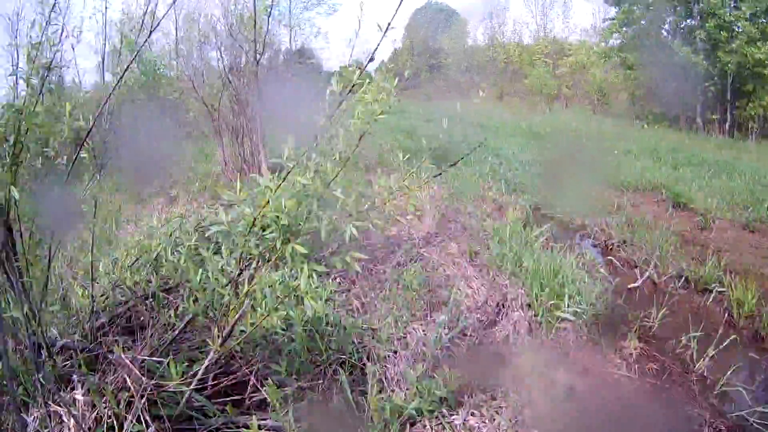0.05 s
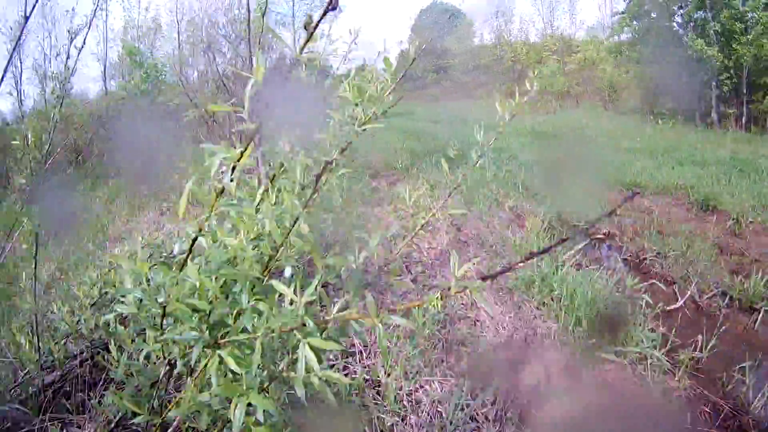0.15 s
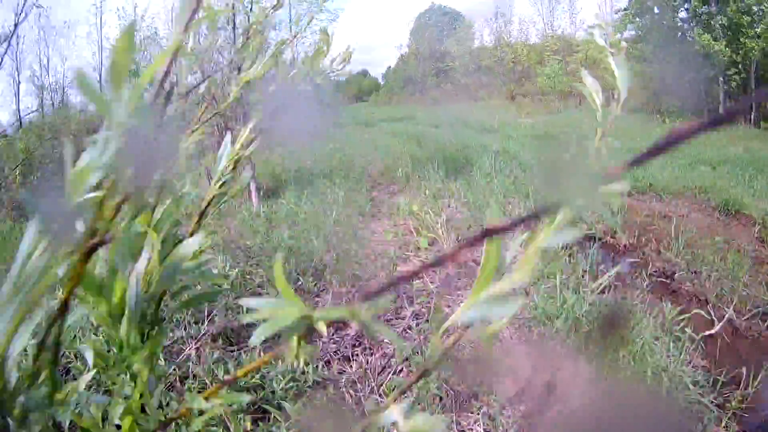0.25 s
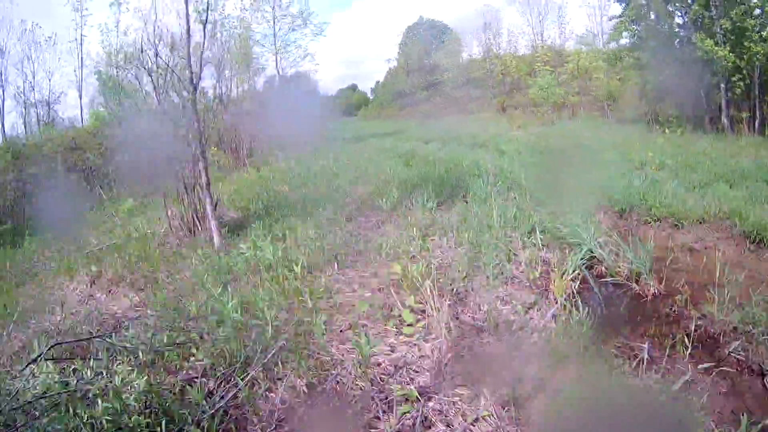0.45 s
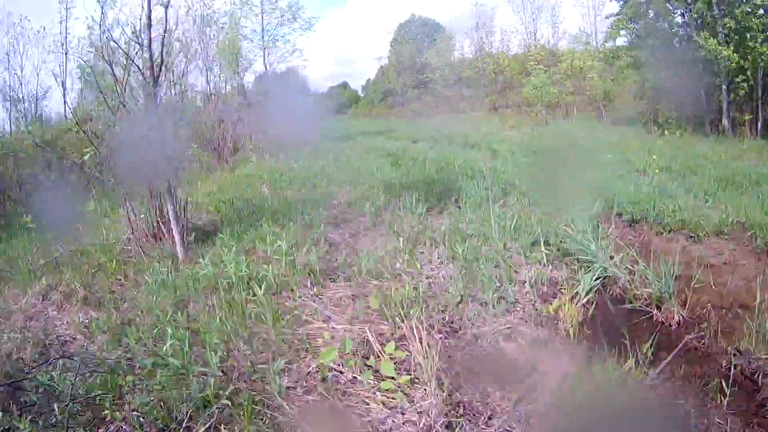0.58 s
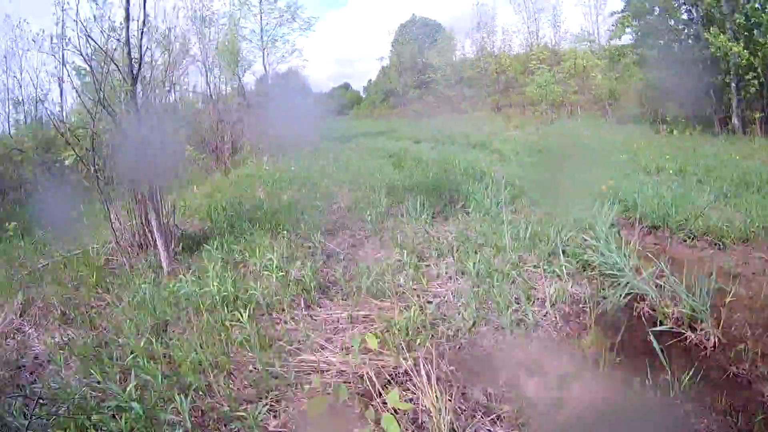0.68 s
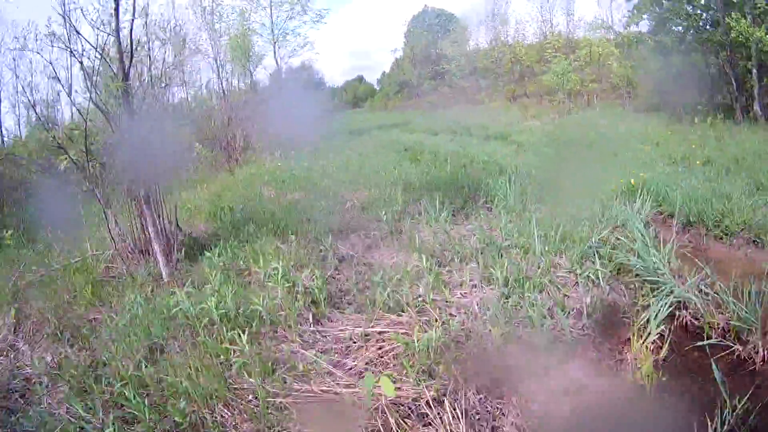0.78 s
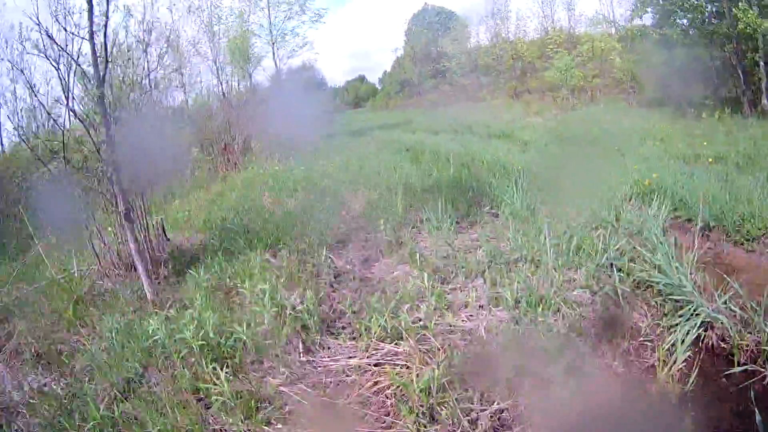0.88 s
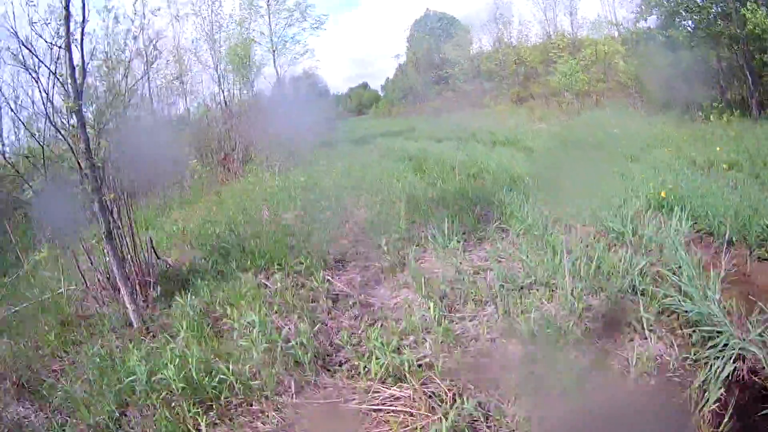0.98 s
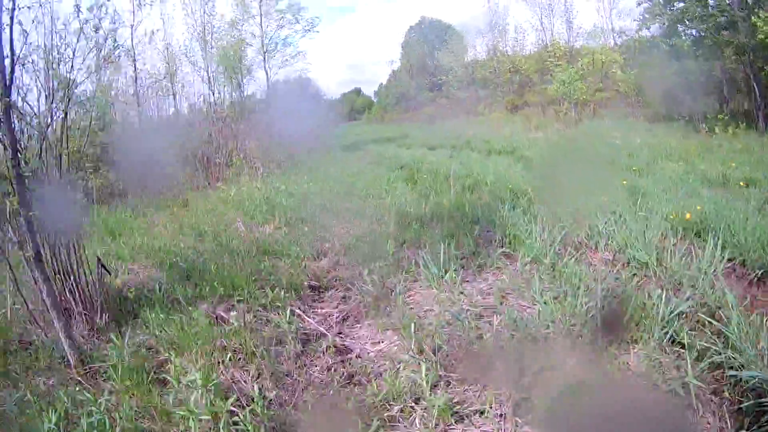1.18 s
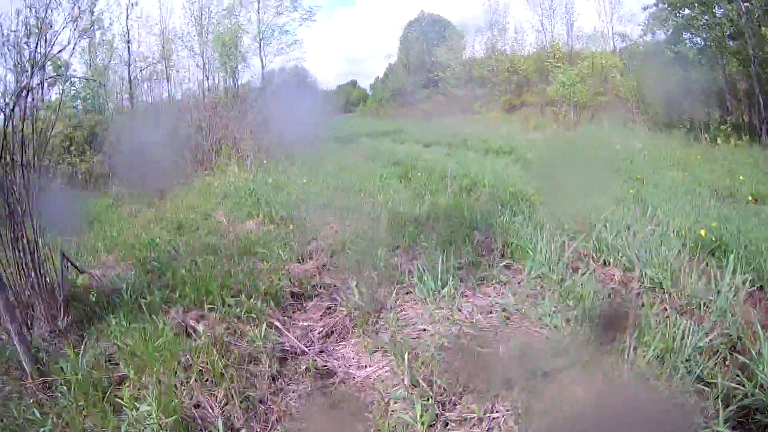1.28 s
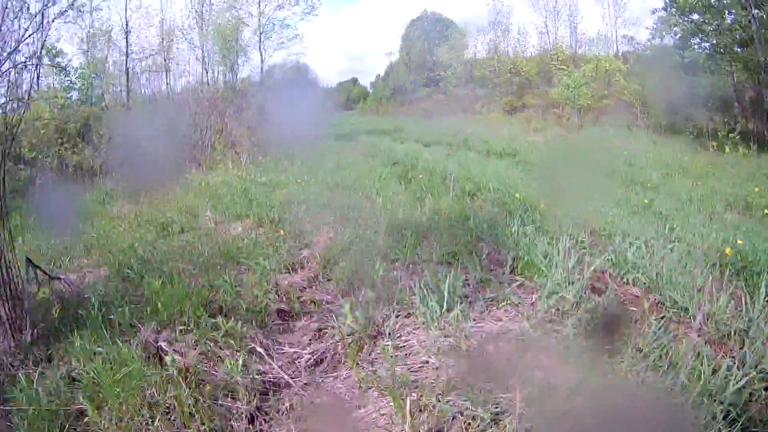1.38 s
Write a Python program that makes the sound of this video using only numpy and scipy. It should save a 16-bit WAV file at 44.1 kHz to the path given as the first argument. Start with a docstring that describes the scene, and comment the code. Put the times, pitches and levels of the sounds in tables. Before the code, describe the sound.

Close, hollow knocks of a branch strike a plastic vehicle shell, ending in a hard, cracking slap. Then twigs tick and a panel thuds softly over bumps, while the off-road vehicle crawls along a trail with a low, uneven rumble.

```python
"""A leafy branch knocks four times on the plastic shell of an off-road vehicle, close to the microphone.
Each blow rings the shell's modes under contact noise and cracks; the last slap shoves the mount and clips.
Later, twigs tick against the body and a panel thuds softly over bumps. Underneath, the vehicle crawls
along a grassy trail, its uneven firings rumbling through the exhaust under a dull running noise."""
import sys
import numpy as np
from scipy.fft import rfft, irfft, next_fast_len
from scipy.io import wavfile

SR = 44100
rng = np.random.default_rng(int(sys.argv[2]) if len(sys.argv) > 2 else 0)


def pcm_store(signal):
    """Save signal as 16-bit PCM."""
    levels = np.round(np.clip(np.atleast_2d(signal), -1, 1) * 32767)
    wavfile.write(sys.argv[1], SR, levels.astype(np.int16).T)


N = 63945
CONTACT_RISE_S = 0.00051


def amp(db):
    """dB to gain."""
    return 10 ** (np.asarray(db) / 20)


def unit(x):
    """Scale to rms 1."""
    return x / np.sqrt(np.mean(x ** 2) + 1e-20)


def curves(rows):
    """Per-sample curve for each column after t/s."""
    times_s, *cols = np.transpose(rows)
    return [np.interp(np.arange(N) / SR, times_s, col) for col in cols]


def since(start_s):
    """Seconds since start_s, zero before."""
    return np.maximum(np.arange(N) / SR - start_s, 0)


def colour(points):
    """Gain against frequency from rows of f/Hz, level/dB."""
    f_hz, db = np.transpose(points)
    return lambda hz: amp(np.interp(np.log(hz + 1), np.log(f_hz + 1), db))


def filtered(x, gain):
    """Minimum-phase filter with magnitude gain(hz)."""
    m = 2 * next_fast_len(N)
    cepstrum = irfft(np.log(np.maximum(gain(np.fft.rfftfreq(m, 1 / SR)), 1e-6)))
    cepstrum[1:m // 2] *= 2
    cepstrum[m // 2 + 1:] = 0
    return irfft(rfft(x, m) * np.exp(rfft(cepstrum)))[:N]


def noise(gain):
    """Coloured noise, rms 1."""
    return unit(filtered(rng.standard_normal(N), gain))


def burst(start_s, decay_s, gain, rise_s=CONTACT_RISE_S):
    """Rough contact: noise with quick rise, exponential fall."""
    t = since(start_s)
    return noise(gain) * (1 - np.exp(-(t / rise_s) ** 2)) * np.exp(-t / decay_s)


def swell(t, rise_s, t60_s):
    """Soft attack and decay, peak 1."""
    shape = (1 - np.exp(-(t / rise_s) ** 2)) * amp(-60 * t / t60_s)
    return shape / shape.max()


def mode(t, hz, db, t60_s):
    """Damped sine of one struck mode."""
    return amp(db - 60 * t / t60_s) * np.sin(2 * np.pi * hz * t)


def vehicle():
    """Uneven firings through the exhaust, rumble, boom, and running noise throbbing at the firing rate."""
    engine = [(0, 24.8, -42), (.25, 25.3, -38), (.48, 26, -39), (.62, 25, -40.5), (.83, 27.5, -46),
              (.9, 28.4, -38), (.98, 27.5, -33), (1.05, 27, -40), (1.2, 26.5, -39), (1.3, 29, -40),
              (1.45, 22, -37.5)]  # t/s, firing rate/Hz, level/dB
    exhaust_spectrum = [(10, -11), (28, -10), (55, -4.5), (82, 1.5), (105, -1.5), (135, -3), (170, -11.5),
                        (260, -17.5), (500, -50), (2000, -73)]  # f/Hz, level/dB
    running_spectrum = [(100, -4.5), (230, -5.5), (320, -11.5), (410, -3.5), (500, 2.5), (570, -5),
                        (690, -3.5), (790, -14.5), (900, -8.5), (1200, -14.5), (1500, -7.5), (1800, -11),
                        (2150, -21), (2550, -37), (3800, -35), (5000, -50), (7000, -53), (9000, -74.5)]  # f/Hz, level/dB
    running_levels = [(0, -39.5), (.2, -39.5), (.43, -38.5), (.56, -43), (.82, -43), (.92, -36.5),
                      (1.06, -42), (1.27, -38), (1.45, -40.5)]  # t/s, level/dB
    boom_levels = [(0, -53), (.06, -40), (.14, -48), (.25, -42), (.33, -49), (.46, -44), (.58, -61.5),
                   (.78, -47.5), (.84, -52), (.885, -34), (.94, -50), (1.05, -53.5), (1.45, -58)]  # exhaust boom: t/s, level/dB
    jitter_s, scatter_db, rumble_db = 0.00088, 4, 6.5
    throb_depth, boom_order = 0.16, 3
    rate_hz, level_db = curves(engine)
    cycles = np.cumsum(rate_hz) / SR
    firings = np.flatnonzero(np.diff(np.floor(cycles)))
    rumble = noise(colour(exhaust_spectrum))
    running = noise(colour(running_spectrum))
    lag, strength = rng.standard_normal((len(firings), 2)).T
    firings = np.clip(firings + lag * jitter_s * SR, 0, N - 1).astype(int)
    pulses = np.bincount(firings, amp(scatter_db * strength), N)
    exhaust = unit(filtered(pulses, colour(exhaust_spectrum)))
    running *= amp(curves(running_levels)[0]) * (1 + throb_depth * np.cos(2 * np.pi * cycles))
    boom = amp(curves(boom_levels)[0]) * unit(np.sin(2 * np.pi * boom_order * cycles))
    return amp(level_db) * unit(exhaust + amp(rumble_db) * rumble) + boom + running


def bumps():
    """Trail bumps: hollow panel thuds with slight rattle, low wheel jolts."""
    thuds = [(.655, -27, 497), (.891, -19, 477), (.947, -27, 530.4), (1.268, -31.5, 568)]  # t/s, level/dB, f/Hz
    jolts = [(.955, -32.5, 79), (1.283, -31, 50)]  # t/s, level/dB, f/Hz
    rattle_spectrum = [(100, -9.5), (230, 3.5), (450, -2.5), (800, 0.5), (1100, -5.5), (1300, -7),
                       (1900, -5), (2500, -29.5), (5000, -48), (16000, -86.5)]  # f/Hz, level/dB
    rattle_db = -10.5
    out = np.zeros(N)
    for start_s, db, hz in thuds:
        t = since(start_s)
        panel = np.sin(2 * np.pi * hz * t) + amp(rattle_db) * noise(colour(rattle_spectrum))
        out += amp(db) * swell(t, rise_s=0.0055, t60_s=0.068) * panel
    for start_s, db, hz in jolts:
        t = since(start_s)
        out += amp(db) * swell(t, rise_s=0.012, t60_s=0.16) * np.sin(2 * np.pi * hz * t)
    return out


def twigs_and_leaves():
    """Dry twig ticks and thin leaf flicks against the body."""
    ticks = [(.393, -29.5, 0.0028), (0.655, -49.5, .012), (.72, -50.5, 0.006), (0.737, -48.5, .003),
             (.765, -38.5, 0.0047), (0.775, -54, .004), (0.859, -39.5, .005), (0.885, -50, 0.013),
             (0.948, -48, 0.0072), (0.975, -42, 0.0045)]  # t/s, level/dB, decay/s
    flicks = [(.005, -55.5, 0.0091), (0.094, -59, 0.0045), (0.109, -59.5, .005), (0.156, -62.5, 0.012),
              (0.21, -62, .008), (.42, -61.5, 0.011)]  # t/s, level/dB, decay/s
    twig_spectrum = [(200, -16.5), (1200, -4.5), (1850, 6), (2400, -13.5), (3100, -4.5), (4500, -12),
                     (5000, -29), (7200, -34), (7900, -46), (16000, -57)]  # f/Hz, level/dB
    leaf_spectrum = [(500, -27), (3000, 0.5), (5800, -9), (7200, -8.5), (8000, -15), (16000, -30)]  # f/Hz, level/dB
    out = np.zeros(N)
    for contacts, spectrum in (ticks, twig_spectrum), (flicks, leaf_spectrum):
        for start_s, db, decay_s in contacts:
            out += amp(db) * burst(start_s, decay_s, colour(spectrum))
    return out


def mount_shove():
    """The hardest slap shoves the microphone mount: one low pulse, short sway."""
    mount_modes = [(55.3, -14, 0.13), (138, -11, .12), (209, -19.5, 0.17)]  # f/Hz, level/dB, t60/s
    slap_s, width_s, level_db = 0.3462, 0.0014, -11
    shove = np.exp(-((np.arange(N) / SR - slap_s) / width_s) ** 2)
    sway = sum(mode(since(slap_s), *row) for row in mount_modes)
    return amp(level_db) * (shove - sway)


def wood_snaps():
    """Short bright cracks within the blows set the branch's wood ringing."""
    snaps = [(0.221, -43, 0.0012, -43), (0.2537, -27.5, 0.00058, -21), (0.344, -7.5, 0.0017, -20.5),
             (0.356, -7, .0005, -28.5)]  # t/s, level/dB, decay/s, ring level/dB
    snap_spectrum = [(500, -26.5), (2000, -6.5), (4400, 6.5), (6000, -7), (7200, -7), (8000, -26),
                     (10500, -16.5), (11700, -12.5), (12900, -31), (15200, -35), (16400, -62.5)]  # f/Hz, level/dB
    wood_modes = [(2907, -5, .02), (4420, 0, 0.02), (5750, -20.5, 0.021)]  # f/Hz, level/dB, t60/s
    out = np.zeros(N)
    for start_s, db, decay_s, ring_db in snaps:
        t = since(start_s)
        ring = sum(mode(t, *row) for row in wood_modes)
        ring *= 1 - np.exp(-t / CONTACT_RISE_S)
        snap = burst(start_s, decay_s, colour(snap_spectrum), rise_s=0.000098)
        out += amp(db) * snap + amp(ring_db) * ring
    return out


def branch():
    """Each blow rings a band of shell modes, with contact noise and a crack; leaves drag in between."""
    # 2-3 blows per knock: t/s, level/dB, band centre/Hz, half-width/oct, decay/s, relative crack/dB
    blows = [(0.2227, -7, 1640, 0.33, 0.0035, -15), (.2245, -12, 606, 0.47, 0.0022, -21.5),
             (0.2468, -11, 1340, 0.17, 0.0075, -20), (.2522, 0, 1047, .7, 0.0023, -21),
             (.2530, -3, 415.4, 0.38, 0.0046, -32), (0.3011, -7.5, 1720, 0.26, .007, -20),
             (.3025, -3.5, 636, .4, 0.0065, -35), (0.3451, 2.5, 1657, 0.79, .003, -6),
             (0.3524, -2, 1850, .5, .0038, -5.5), (.360, -11.5, 703, 1.0, 0.0026, -24)]
    shell_modes = [(326.2, -4.5, 0.17), (413.2, 0.5, .085), (495, -6.5, 0.053), (569, -7, 0.067),
                   (652.4, -6, .075), (698.5, -4, 0.1), (881.6, -2.5, 0.043), (940, -6, 0.036),
                   (1098, -5.5, 0.029), (1320, -4.5, 0.036), (1444, -2.5, 0.017), (1585, -3, 0.049),
                   (1824, -8.5, 0.048), (2176, -6, .035), (4400, -25, 0.02)]  # f/Hz, level/dB, t60/s
    contact_spectrum = [(100, -30), (250, -26.5), (330, 0.5), (1000, 7.5), (1900, -1), (2500, -20),
                        (4400, -19), (5200, -35), (7200, -42), (8000, -57), (16000, -65)]  # f/Hz, level/dB
    crack_spectrum = [(200, -21), (900, -4), (1900, 0), (2500, -6), (4400, -9.5), (5200, -20.5),
                      (7200, -35), (7900, -48), (16000, -64)]  # f/Hz, level/dB
    leaf_drag = [(.2, -60), (.225, -39.5), (.27, -32), (.295, -38.5), (.32, -27), (.342, -16.5),
                 (.362, -27.5), (.382, -40), (.43, -56), (.5, -66)]  # t/s, level/dB
    ring_db, contact_db, scatter_db = -5, -7, 1
    contact_gain = colour(contact_spectrum)
    out = amp(curves(leaf_drag)[0]) * noise(contact_gain)
    for start_s, db, centre_hz, width_oct, decay_s, crack_db in blows:
        t = since(start_s)
        band = lambda hz: 1 / (1 + (np.log2((hz + 1) / centre_hz) / width_oct) ** 4)
        ring = sum((-1) ** k * band(hz) * mode(t, hz, mode_db + rng.normal(0, scatter_db), t60_s)
                   for k, (hz, mode_db, t60_s) in enumerate(shell_modes))
        ring *= 1 - np.exp(-t / CONTACT_RISE_S)
        contact = burst(start_s, decay_s, lambda hz: band(hz) * contact_gain(hz))
        crack = burst(start_s, decay_s, colour(crack_spectrum))
        out += amp(db) * (amp(ring_db) * ring + amp(contact_db) * contact + amp(crack_db) * crack)
    return out


def scene():
    """All sources at one microphone, over its faint hiss."""
    hiss = amp(-79.5) * rng.standard_normal(N)
    knocks = branch() + wood_snaps() + mount_shove()
    return (hiss + knocks + twigs_and_leaves() + bumps() + vehicle())[None]


def record(dry):
    """Recorder: clips the loudest blows, then band-limits."""
    ceiling, hardness, cutoff_hz = 0.95, 8, 16400
    clipped = dry / (1 + np.abs(dry / ceiling) ** hardness) ** (1 / hardness)
    m = 2 * next_fast_len(N)
    passband = np.fft.rfftfreq(m, 1 / SR) < cutoff_hz
    return irfft(rfft(clipped, m) * passband, m)[:, :N]


dry = scene()
out = record(dry)
pcm_store(out)
```